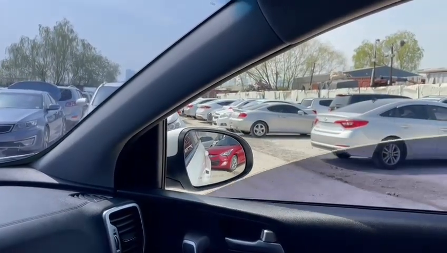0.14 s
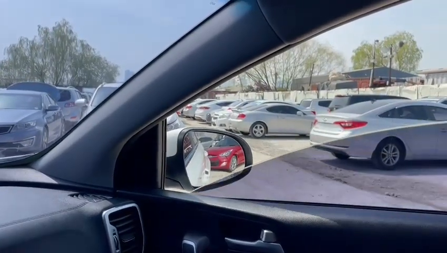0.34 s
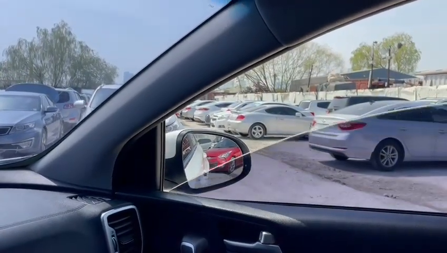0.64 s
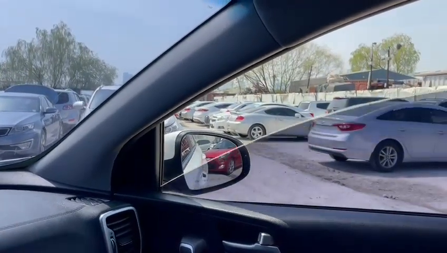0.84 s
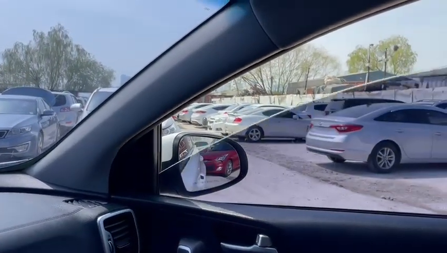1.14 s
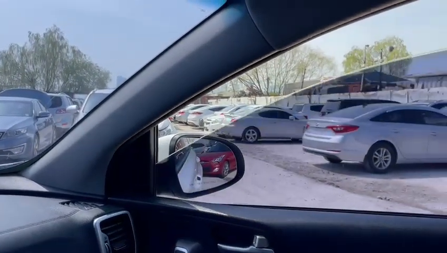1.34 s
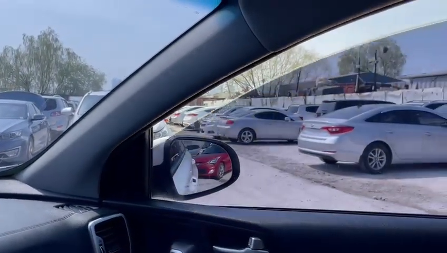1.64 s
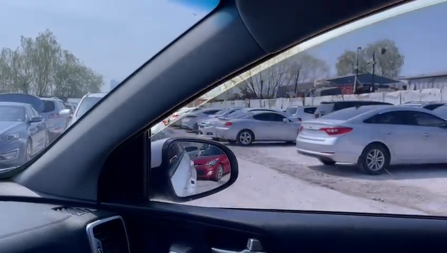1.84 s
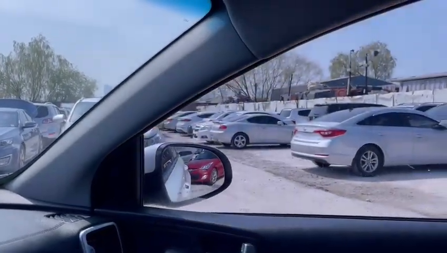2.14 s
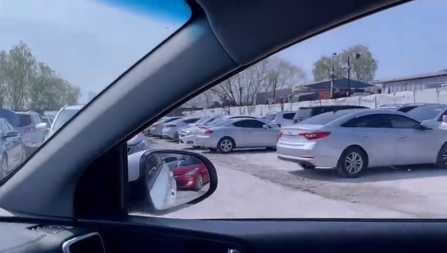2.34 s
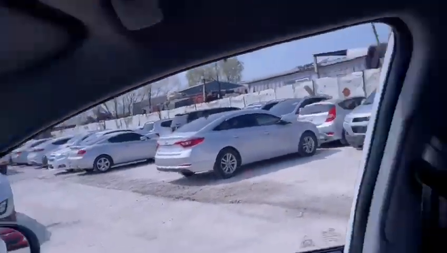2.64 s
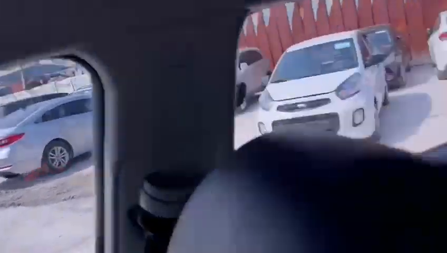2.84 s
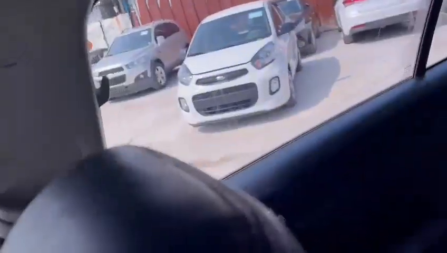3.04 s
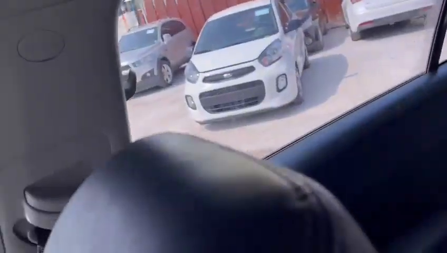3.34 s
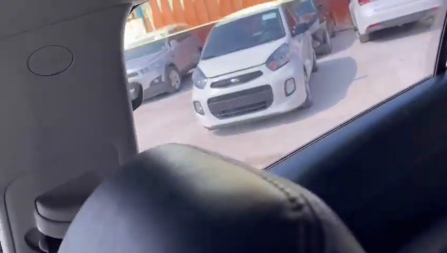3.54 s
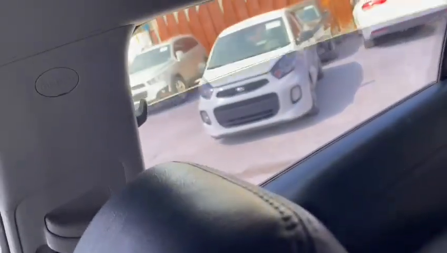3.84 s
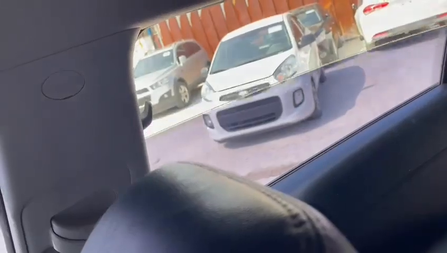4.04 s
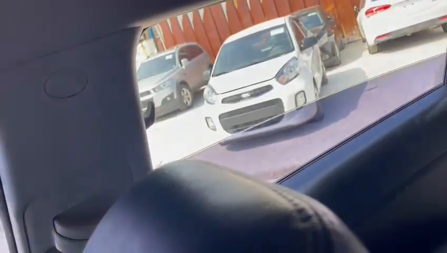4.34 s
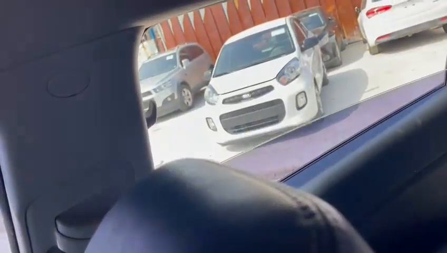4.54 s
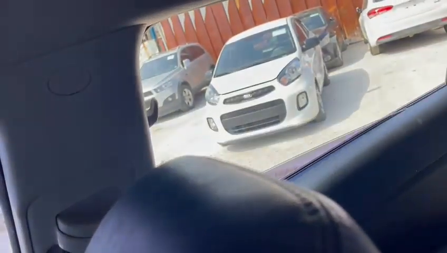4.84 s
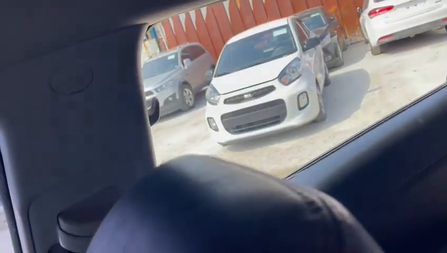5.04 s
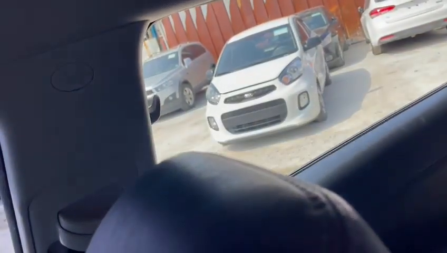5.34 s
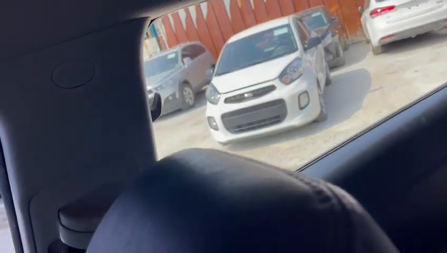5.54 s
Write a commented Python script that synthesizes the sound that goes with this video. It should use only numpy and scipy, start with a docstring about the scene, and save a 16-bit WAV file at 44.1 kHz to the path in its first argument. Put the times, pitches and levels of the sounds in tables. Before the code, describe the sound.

Low engine boom in a car cabin while one electric window rises with a climbing whine and clunks, then another clacks loose and lowers.

```python
"""The low boom of an idling engine, heard from inside the parked car, under a front window whining upward.
The glass hisses in its channels and thuds into its frame; switches snap and cloth rustles faintly.
A rear window then breaks free of its seal, runs down, bumps its lower stop and starts to move again.
Engine and motors are sums of tones that follow their speeds; rubbing is coloured noise;
knocks and clicks are decaying panel and shell modes with short noise from the trim and cabin."""
import sys
import numpy as np
from scipy import signal
from scipy.fft import rfft, irfft, next_fast_len
from scipy.io import wavfile
from scipy.ndimage import map_coordinates

SR = 44100
rng = np.random.default_rng(int(sys.argv[2]) if len(sys.argv) > 2 else 0)


def int16_out(signal):
    """Quantize to a 16-bit WAV file."""
    q = np.round(np.clip(np.atleast_2d(signal).T, -1, 1) * 32767)
    wavfile.write(sys.argv[1], SR, q.astype(np.int16))


N = 251370

# likeness of the left and right microphone ports: hz, correlation (0 to 1)
LIKENESS = [(50, 0.87), (150, 0.96), (350, 0.66), (600, 0.34), (1400, 0.092), (3000, 0.55), (5500, 0.58),
            (9000, 0.053)]
# colour of glass rubbing on felt and rubber: hz, relative density_db (per Hz)
RUB_COLOUR = [(60, -27), (150, 0.5), (300, 8), (500, 6), (800, -2.5), (1200, 0.5), (1800, -2.5), (2800, -3),
              (4500, -6.5), (6500, -11), (9000, -17), (12000, -29.5)]


def amp(db):
    """Decibels to gain."""
    return 10 ** (np.asarray(db) / 20)


def unit(x):
    """Scale to rms 1."""
    return x / np.sqrt(np.mean(x ** 2) + 1e-20)


def along(points, hz):
    """Read (Hz, value) points on a log frequency axis."""
    f, v = np.transpose(points)
    return np.interp(np.log(hz + 1), np.log(f + 1), v)


def curves(rows):
    """One value per sample for each column after the time."""
    s, *cols = np.transpose(rows)
    return [np.interp(np.arange(N) / SR, s, c) for c in cols]


def wobble(rate):
    """A smooth random curve, rate knots a second."""
    knots = rng.standard_normal(int(N * rate / SR) + 4)
    return map_coordinates(knots, [np.arange(N) * rate / SR])


def filtered(x, response):
    """x through a response of frequency."""
    n = x.shape[-1]
    m = next_fast_len(n + SR // 4)
    return irfft(rfft(x, m) * response(np.fft.rfftfreq(m, 1 / SR)), m)[..., :n]


def port_angle(hz):
    """The phase angle in radians whose cosine is the likeness of the two ports."""
    return np.arccos(np.clip(along(LIKENESS, hz), -1, 1))


def noise(colour, size=N):
    """Stereo noise of rms 1 and colour(Hz) dB: nearly mono in the low bass, mostly wider above."""
    def mid_side(hz):
        turn = port_angle(hz) / 2
        return amp(colour(hz)) * [np.cos(turn), np.sin(turn)]

    mid, side = filtered(rng.standard_normal((2, size)), mid_side)
    return unit(np.array([mid + side, mid - side]))


def tone(turns, hz, skew=0.17):
    """A stereo sine of rms 1; the less alike the ports at hz, the further out of step they are."""
    apart = skew * port_angle(hz)
    return np.sqrt(2) * np.sin(2 * np.pi * (turns + rng.random()) + np.array([[apart], [-apart]]))


def add(track, s, sound):
    """Mix a sound into the track at time s."""
    part = track[:, round(s * SR):][:, :sound.shape[-1]]
    part += sound[..., :part.shape[-1]]


def running(start_s, stop_s, fade_s=0.012):
    """1 while a motor turns, with a short fade just outside each end."""
    t = np.arange(N) / SR
    return np.clip(np.minimum(t - start_s, stop_s - t) / fade_s + 1, 0, 1)


def swell(s, rise_s, hold_s, fall_s):
    """A gain that grows to 1 at time s, holds and dies away."""
    t = np.arange(N) / SR - s
    return np.exp(np.minimum(t, 0) / rise_s - np.maximum(t - hold_s, 0) / fall_s)


def engine():
    """Firing orders boom through the body, over a rumble that throbs with each firing."""
    # idle from the front seat, then facing the rear: time_s, octave_hz (twice the firing rate, the
    # strongest order), octave_db, boom_db (third firing harmonic)
    idle = [(0, 52.72, -30.5, -43), (1.4, 52.32, -31, -41.5), (2.7, 52.96, -34, -38),
            (3.5, 51.96, -35.5, -36), (4.9, 52.31, -36, -39.5), (5.7, 52.77, -33.5, -36.5)]
    # other engine orders: multiple of the firing rate, level_db against the octave
    orders = [(1, -15.5), (2.5, -18.5), (4, -13), (5, -24.5), (6, -27.5), (7, -26), (7.5, -31), (10, -33.5),
              (11, -34)]
    # belt-driven parts humming off the firing orders: hz, level_db
    belt = [(43.6, -56), (73, -49)]
    # cabin rumble: hz, relative density_db (per Hz)
    cabin = [(15, -11.5), (27, 4), (40, -6.5), (60, 3), (110, -2), (160, -1), (260, -9), (380, -11.5),
             (520, -21.5), (750, -20), (1100, -35.5), (2200, -42), (4500, -59), (11000, -63)]
    octave_hz, db, boom_db = curves(idle)
    firings = np.cumsum(octave_hz / 2) / SR
    hz = octave_hz.mean() / 2
    hum = amp(db + 0.54 * wobble(14.0)) * tone(2 * firings, 2 * hz)
    hum += amp(boom_db + .9 * wobble(8)) * tone(3 * firings, 3 * hz)
    for order, order_db in orders:
        # no two combustions are alike, so the weak orders waver in level and phase
        level = amp(db + order_db + 1.8 * wobble(11))
        hum += level * tone(order * firings + 0.099 * wobble(3.85), order * hz)
    for belt_hz, belt_db in belt:
        hum += amp(belt_db + 2 * wobble(4)) * tone(belt_hz * np.arange(N) / SR, belt_hz)
    throb = unit(amp(1.8 * np.cos(2 * np.pi * firings)))
    return hum + amp(-43.5) * throb * noise(lambda f: along(cabin, f))


def sliding():
    """Glass rubs along felt and rubber with an uneven grip and squeezes through seals; the door rumbles."""
    # glass travelling in its channels: start_s, stop_s, level_db, first_treble_db, last_treble_db,
    # door_rumble_db, rumble_growth (dB/s)
    travels = [(-.1, 2.24, -51.5, -2, -0.5, -23.5, 11.5), (3.06, 5.285, -55.5, 7, -8.5, 7.5, -0.5),
               (5.385, 5.8, -53, -16.5, -20, 17.5, -42)]
    # glass squeezing into or out of a seal: time_s, level_db, rise_s, hold_s, fall_s, treble_db, door_rumble_db
    squeezes = [(2.198, -43, 0.013, 0.069, 0.013, -5.5, -14), (3.073, -40, 0.012, 0.011, 0.048, -3.5, 13.5),
                (5.255, -51.5, 0.011, 0.013, 0.092, -13, 15)]
    attack_s, release_s = 0.017, 0.008
    colour_power = 2.65  # the treble changes mostly late in the travel
    t = np.arange(N) / SR
    rub = noise(lambda f: along(RUB_COLOUR, f))
    treble = filtered(rub, lambda f: f ** 2 / (f ** 2 + 3500 ** 2))
    bass = filtered(rub, lambda f: 1 / (1 + (f / 380) ** 4))

    def coloured(treble_db, rumble_db):
        return rub + (amp(treble_db) - 1) * treble + (amp(rumble_db) - 1) * bass

    out = np.zeros((2, N))
    for s, db, rise_s, hold_s, fall_s, treble_db, rumble_db in squeezes:
        out += amp(db) * swell(s, rise_s, hold_s, fall_s) * coloured(treble_db, rumble_db)
    for start, stop, db, first_db, last_db, rumble_db, growth in travels:
        moved_s = np.clip(t - start, 0, stop - start)
        envelope = (1 - np.exp(-moved_s / attack_s)) * np.exp(-np.maximum(t - stop, 0) / release_s)
        treble_db = first_db + (last_db - first_db) * (moved_s / (stop - start)) ** colour_power
        out += amp(db) * envelope * coloured(treble_db, rumble_db + growth * moved_s)
    grip_db = 0.39 * wobble(9.1) + 0.71 * wobble(140)
    return amp(grip_db) * out


def motor(slot_hz, levels, shaft_orders, hum_db=0, flutter=.003, rough_db=1.5, slot_count=8):
    """A window motor: its rotor slots whine, and the unbalanced shaft shakes the door at lower orders."""
    slots = np.cumsum(slot_hz * (1 + flutter * wobble(45))) / SR
    hz = slot_hz.mean()
    whine = sum(amp(db + rough_db * wobble(35)) * tone(k * slots, k * hz)
                for k, db in enumerate(levels, 1))
    for order, db in shaft_orders:
        # the loose door panel blurs the hum in level and phase
        shake = amp(db + hum_db + 2.5 * wobble(22))
        whine += shake * tone(order * slots / slot_count + 0.098 * wobble(20), order * hz / slot_count)
    return whine


def front_window(count=4, fade_db=2.8):
    """The motor speeds up as the glass rises, sweeping count harmonics through the door's resonances."""
    # motor speed apart from the snag: time_s, rotor_slot_hz
    speed = [(0, 440), (0.201, 424.4), (.416, 437), (.484, 448.8), (0.67, 458), (0.762, 479), (1.15, 504.9),
             (1.32, 527.3), (1.442, 532.7), (1.522, 556.4), (1.83, 574.5), (2.028, 605.6), (2.11, 605),
             (2.2, 590)]
    # how loudly the door radiates a slot harmonic: hz, level_db
    door = [(420, -39), (455, -41), (490, -40.5), (507, -47.5), (530, -59.5), (590, -54.5), (700, -67),
            (880, -62.5), (940, -73), (985, -69), (1060, -68), (1110, -56.5), (1210, -56.5), (1290, -66),
            (1350, -64), (1405, -56), (1460, -62), (1520, -64), (1590, -61), (1660, -62), (1700, -66.5),
            (1750, -61.5), (1830, -74), (2050, -73), (2240, -67), (2400, -86)]
    # rotor unbalance shaking the door: multiple of the shaft rate, level_db
    shaft = [(1, -67), (3, -70), (4, -57), (5, -71), (6, -75), (18, -72), (22, -73.5)]
    # the rising glass catches once, and the motor briefly slows
    snag_s, snag_width_s, snag_slows_hz, snag_db = 1.245, 0.03105, 32.86, -1.5
    snag = np.exp(-((np.arange(N) / SR - snag_s) / snag_width_s) ** 2)
    slot_hz = curves(speed)[0] - snag_slows_hz * snag
    levels = []
    for k in range(1, count + 1):
        # the shorter the wavelength, the more a harmonic fades in and out as the glass moves
        fading_db = fade_db * np.sqrt(k - 1) * wobble(9.12)
        levels.append(along(door, k * slot_hz) + snag_db * snag + fading_db)
    return running(speed[0][0], speed[-1][0]) * motor(slot_hz, levels, shaft, flutter=0.003, rough_db=1)


def with_rebounds(rows):
    """Each blow and its rebound, which is duller and shakes the trim less for its strength."""
    for s, db, low_hz, sharp_hz, rattle_db, rebound_db, pan_db in rows:
        yield s, db, low_hz, sharp_hz, rattle_db, pan_db
        yield s + .02, db + rebound_db, low_hz, sharp_hz * 0.57, rattle_db + rebound_db - 4, pan_db


def blows(rows, panel, skew=0.22):
    """Blows ring the panel and shake the trim; soft contacts miss the high modes, light parts the low ones."""
    # trim rattle: hz, relative density_db (per Hz)
    trim = [(40, -35), (100, -12), (220, 10.5), (350, 13), (550, -4), (850, -4), (1300, -5.5),
            (2200, -16.5), (5000, -63), (12000, -69.5)]
    # ring of the trim in the cabin: hz, t60_s
    room = [(80, 0.7), (300, 0.063), (800, 0.22), (3000, 0.077), (10000, .08)]
    out, t = np.zeros((2, N)), np.arange(SR // 2) / SR

    def mode(hz):
        # the less alike the ports, the further out of step a mode may reach them
        apart = skew * port_angle(hz) * rng.normal()
        return np.sin(2 * np.pi * hz * t + apart * np.array([[1], [-1]]))

    for s, db, low_hz, sharp_hz, rattle_db, pan_db in with_rebounds(rows):
        ring = np.zeros((2, len(t)))
        for k, (hz, level, t60) in enumerate(panel):
            reach = 1 / np.hypot(1, (hz / sharp_hz) ** 2) / np.hypot(1, (low_hz / hz) ** 2)
            decay = amp(level + rng.normal(0, 1) - 60 * t / t60)
            ring += decay * reach * (-1) ** k * mode(hz)
        # each band of the rattle dies away at its own rate
        hz, when, z = signal.stft(noise(lambda f: along(trim, f), size=len(t)), SR, nperseg=256)
        faded = z * amp(-60 * when / along(room, hz)[:, None])
        rattle = signal.istft(faded, SR)[1][:, :len(t)]
        blow = (amp(db) * ring + amp(rattle_db) * rattle) * (1 - np.exp(-t / 0.001))
        add(out, s, amp([[pan_db / 2], [-pan_db / 2]]) * blow)
    return out


def front_blows():
    """Glass and lifter strike in the front door, and its panel rings."""
    # blows of glass, lifter and switch: time_s, ring_db, lowest_mode_hz, contact_sharpness_hz,
    # trim_rattle_db, rebound_db (against the blow), left_minus_right_db
    strikes = [(2.202, -22, 40, 170, -47, -23, -1), (2.24, -22, 120, 540, -34, -22, -2),
               (2.246, -12, 40, 186, -33, -7.5, 0.5), (2.306, -21.5, 40, 110, -76, -24, 0.5),
               (2.427, -41, 250, 1000, -59, -21, -9)]
    # modes of the door panel: hz, level_db, t60_s
    panel = [(49.7, -6, 0.32), (68, -2, 0.18), (105.6, 4.5, 0.12), (146, 5, 0.042), (193, 0.5, 0.092),
             (212, 0, 0.088), (322, 1, 0.072), (405, -2, 0.17), (553, -6, 0.09), (636, -5, 0.049),
             (783, -4.5, 0.068), (980, -14, 0.045)]
    return blows(strikes, panel)


def contacts(rows):
    """Each click is two contacts, the second less pitched."""
    for s, db, pitch_hz, emphasis_db, second_db, ring_db, pan_db in rows:
        yield s, db, pitch_hz, emphasis_db, ring_db, pan_db
        yield s + .0115, db + second_db, pitch_hz, emphasis_db * 0.35, ring_db, pan_db


def clicks(rows, shell):
    """Plastic snaps ring their shell and are scattered by the cabin's glass and trim."""
    # scattered snap: hz, relative density_db (per Hz)
    plastic = [(150, -18), (400, -7), (800, 2.5), (1400, 7.5), (2400, 2), (3500, 1), (5000, -4.5),
               (7000, -2), (10500, -10), (12000, -29.5)]
    scatter_t60_s = 0.11
    out, t = np.zeros((2, N)), np.arange(SR // 4) / SR
    # the direct snap stands above its echoes
    direct = (1 + 0.7 * np.exp(-t / 0.003)) * (1 - np.exp(-t / 0.0009))
    for s, db, pitch_hz, emphasis_db, ring_db, pan_db in contacts(rows):
        def emphasis(f):
            return emphasis_db / (1 + (np.log2((f + 1) / pitch_hz) / 0.53) ** 2)

        modes = []
        for hz, level, _ in shell:
            # each mode reaches the two ports a little out of step
            phase = rng.random() + 0.18 * rng.standard_normal((2, 1))
            modes.append(amp(level + emphasis(hz)) * np.sin(2 * np.pi * (hz * t + phase)))
        ring = sum(mode * amp(-60 * t / t60) for mode, (_, _, t60) in zip(modes, shell))
        ring = ring / np.std(sum(modes))
        scatter = noise(lambda f: along(plastic, f) + emphasis(f), size=len(t))
        scatter = amp(-60 * t / scatter_t60_s) * scatter
        snap = direct * (amp(-4.0) * scatter + amp(ring_db) * ring)
        add(out, s, amp([[db + pan_db / 2], [db - pan_db / 2]]) * snap)
    return out


def front_clicks():
    """Switches and glass catches snap in the front door."""
    # snaps: time_s, level_db, pitch_hz, emphasis_db (at that pitch), second_contact_db,
    # shell_ring_db, left_minus_right_db
    snaps = [(2.2025, -34.5, 3000, 14, -7.5, -0.5, 1.5), (2.387, -47, 6000, 9.6, -2, -17, -3),
             (2.4245, -31, 3300, 1, -7.5, -1, -3.5), (2.435, -34, 1930, 4, -12.5, -1.5, -1),
             (2.439, -37.5, 9100, 11, -12, -7, -1)]
    # modes of the plastic shell: hz, level_db, t60_s
    shell = [(685, -2, 0.097), (1180, 2, .05), (1370, 0, 0.051), (1870, -4.5, 0.063), (1976, 1.5, 0.079),
             (2600, -5, 0.094), (2970, 0.5, 0.11), (3290, 4, 0.032), (4160, -1, 0.077), (4570, -7, 0.06),
             (5070, -2, 0.07), (5600, 0, 0.06), (5660, -1, 0.055), (6000, -11, 0.042)]
    return clicks(snaps, shell)


def creaks():
    """Under load the lifter and seal slip in uneven little jerks."""
    # bursts of slips: start_s, length_s, level_db, slips_per_s
    bursts = [(2.206, .065, -49, 230), (3.064, 0.055, -35, 100), (5.277, .04, -63, 170),
              (5.464, 0.07, -47, 160)]
    # creak: hz, relative density_db (per Hz)
    creak_colour = [(200, -17.5), (500, 2.5), (1100, 0.5), (1700, 4.5), (2600, 1.5), (3600, -21),
                    (7000, -44), (12000, -45.5)]
    out, t = np.zeros((2, N)), np.arange(SR // 20) / SR
    for s, length, db, rate in bursts:
        for k, (late, size) in enumerate(rng.standard_normal((int(length * rate), 2))):
            strength = amp(db + 3 * size)
            slip = amp(-60 * t / 0.035) * noise(lambda f: along(creak_colour, f), size=len(t))
            add(out, s + (k + 0.26 * late) / rate, strength * slip)
    return out


def rustle():
    """Cloth brushes the seat in small uneven patches as someone turns."""
    # cloth: hz, relative density_db (per Hz)
    cloth = [(200, -17.5), (900, 8), (2000, -0.5), (4200, -7.5), (6500, -11), (11000, -27)]
    patches = amp(-57.5 + 1.4 * wobble(56))
    return swell(s=2.856, rise_s=0.22, hold_s=0, fall_s=0.12) * patches * noise(lambda f: along(cloth, f))


def rear_clicks():
    """Switches and glass catches snap in the rear door."""
    # snaps: time_s, level_db, pitch_hz, emphasis_db (at that pitch), second_contact_db,
    # shell_ring_db, left_minus_right_db
    snaps = [(3.048, -41, 9150, 8.9, -6, -4.5, -1.5), (3.149, -28.5, 4930, 12, -10.5, -16, 1.5),
             (3.261, -34, 4530, 9.4, -8.5, -10, 1), (5.253, -46.5, 3910, 8.7, -14, -5, -2),
             (5.379, -36, 2070, 16, -17, -1, -7), (5.39, -32.5, 5300, 3.6, -10.5, -0.5, 0),
             (5.448, -41, 9700, 13, -8, 0.5, -2), (5.534, -47.5, 2240, 28, -14, -5, -4)]
    # modes of the plastic shell: hz, level_db, t60_s
    shell = [(1710, -6, 0.093), (2080, 3, 0.11), (2120, 3, 0.082), (2276, 7, 0.056), (2368, 6.5, 0.088),
             (2470, 7, 0.078), (2670, 1.5, 0.09), (2830, 0, 0.11), (3440, -0.5, 0.08), (4220, -3, 0.09),
             (4800, 6, 0.055), (4930, -15, 0.073), (5480, -5, 0.078), (6800, -19, 0.082)]
    return clicks(snaps, shell)


def rear_blows():
    """Glass and lifter strike in the rear door, and its panel rings."""
    # blows of glass, lifter and switch: time_s, ring_db, lowest_mode_hz, contact_sharpness_hz,
    # trim_rattle_db, rebound_db (against the blow), left_minus_right_db
    strikes = [(3.064, -28, 597, 1100, -31, -31, 1), (3.075, -25, 170, 420, -23, -27, -0.5),
               (3.088, -20, 50, 89.5, -55, -25, 0), (3.102, -17.5, 260, 1200, -26, -26, 1),
               (3.108, -24.5, 182, 850, -21.5, -26, 0.5), (3.154, -19.5, 79, 145, -42, -33, -1),
               (3.185, -28, 149, 327, -35, 2, -0.5), (3.261, -42, 298, 700, -40, -1, -1),
               (3.81, -38.5, 110, 190, -58, 3, -5), (5.2475, -21, 118, 169, -37, 0, -1),
               (5.269, -23.5, 49.8, 100, -42.5, -9, 1), (5.447, -33, 90, 200, -58, -7, -2),
               (5.483, -30, 170, 400, -34.5, 1, 1), (5.509, -25, 81, 169, -46, -17, -0.5)]
    # modes of the door panel: hz, level_db, t60_s
    panel = [(52.7, 4.5, 0.24), (78.2, 4, 0.51), (113, -2, 0.2), (145.5, 4, 0.11), (204.5, -6, 0.13),
             (233, -3, 0.1), (310, 1.5, 0.089), (356, 2, 0.084), (461, -3, 0.072), (530, -2.5, 0.1),
             (634, -1.5, 0.061), (732, -1, 0.095), (870, -4, 0.047), (940, -8, 0.11), (1070, -11.5, 0.055),
             (1244, -11.5, 0.15)]
    return blows(strikes, panel)


def rear_window(count=2, fade_db=1.2):
    """The motor runs down with the weight of the glass; count harmonics pass the door's resonances."""
    # motor speed: time_s, rotor_slot_hz
    speed = [(3.279, 753.3), (3.45, 754), (3.62, 774.4), (3.85, 766.5), (4.068, 758), (4.269, 735.4),
             (4.44, 722), (4.62, 723.3), (4.82, 711.4), (5.001, 705.3), (5.24, 722.4)]
    # how loudly the door radiates a slot harmonic: hz, level_db
    door = [(700, -65.5), (770, -63.5), (1400, -63.5), (1445, -61.5), (1488, -65), (1510, -68), (1545, -64)]
    # rotor unbalance shaking the door, before hum_db: multiple of the shaft rate, level_db
    shaft = [(1, -44.5), (2, -56.5), (3, -53.5), (4, -64), (5, -86), (9, -74.5), (18, -72)]
    swell_db, swell_s = 12, 0.14  # the whine swells in as the glass gets going
    sink_s, sink_db_per_s = 4.7, 8  # the upper harmonic fades as the glass sinks into the door
    t = np.arange(N) / SR
    slot_hz, = curves(speed)
    start, stop = speed[0][0], speed[-1][0]
    starting = np.exp(-np.maximum(t - start, 0) / swell_s)
    sunk_db = sink_db_per_s * np.maximum(t - sink_s, 0)
    levels = [along(door, k * slot_hz) - swell_db * starting - (k - 1) * sunk_db + fade_db * wobble(38)
              for k in range(1, count + 1)]
    # the faster it turns, the more the door hums (0.0781 dB per Hz)
    hum_db = 1.5 + 0.0781 * (slot_hz - slot_hz.mean())
    whine = motor(slot_hz, levels, shaft, hum_db=hum_db, flutter=0.0033, rough_db=1.5)
    return running(start, stop) * whine


def tight_spots():
    """The rubber seal grips the passing glass and rasps around a broad resonance."""
    # tight spots in the rear channel: time_s, half_length_s, level_db, rasp_hz, emphasis_db
    spots = [(3.816, 0.17, -56, 3900, 4.5), (4.6, 0.33, -58.5, 2450, 9)]
    t = np.arange(N) / SR

    def rasp(hz, emphasis_db):
        return noise(lambda f: along(RUB_COLOUR, f) + emphasis_db / (1 + (np.log2((f + 1) / hz) / 0.3) ** 2))

    return sum(amp(db + 1.6 * wobble(60)) * np.exp(-((t - s) / half_s) ** 2) * rasp(hz, emphasis_db)
               for s, half_s, db, hz, emphasis_db in spots)


def rear_restart():
    """The rear motor spins up again in a brief, unsteady whine and slows under the weight of the glass."""
    # slot harmonics 1, 2 and 3: level_db
    whine_db = [-51.5, -78, -68]
    restart_s, restart_hz = 5.5, 608
    spin_up_hz, spin_up_s, sag_hz_per_s = 100, 0.023, 510
    t = np.maximum(np.arange(N) / SR - restart_s, 0)
    slot_hz = restart_hz - spin_up_hz * np.exp(-t / spin_up_s) - sag_hz_per_s * t
    strain = swell(s=5.595, rise_s=.04, hold_s=0.045, fall_s=.05)
    # a negative rough_db only flips the random flicker
    return running(restart_s, N / SR) * strain * motor(slot_hz, whine_db, [], flutter=0.0203, rough_db=-2)


def scene():
    """Everything heard between the seats, body and windows a shade to the left."""
    body = engine() + front_blows() + rear_blows()
    windows = sliding() + front_window() + rear_window() + tight_spots() + rear_restart()
    switches = front_clicks() + rear_clicks()
    return body * amp([[.35], [-.35]]) + windows * amp([[.6], [-.6]]) + switches + creaks() + rustle()


def record(dry):
    """The microphone port cuts a notch in the treble; nothing passes above the band limit."""
    # port response: hz, gain_db
    port = [(6800, -0.5), (7400, -8), (7900, -38.5), (8800, -22.5), (9600, 1), (10500, 6.5)]
    top_hz = 11900
    return filtered(dry, lambda hz: amp(along(port, hz)) * (hz < top_hz))


dry = scene()
out = record(dry)
int16_out(out)
```